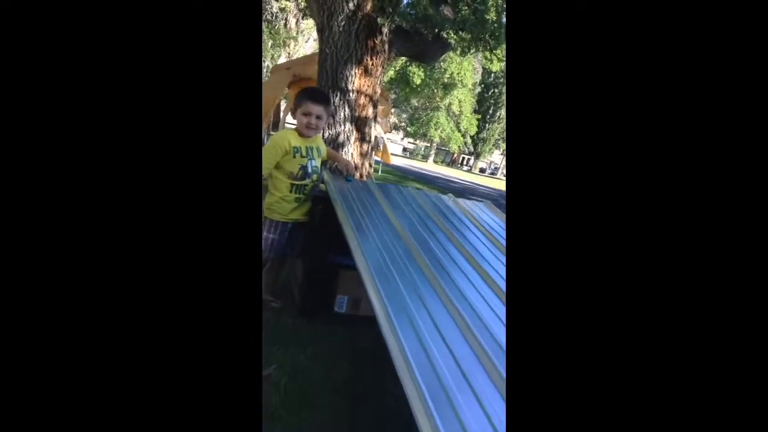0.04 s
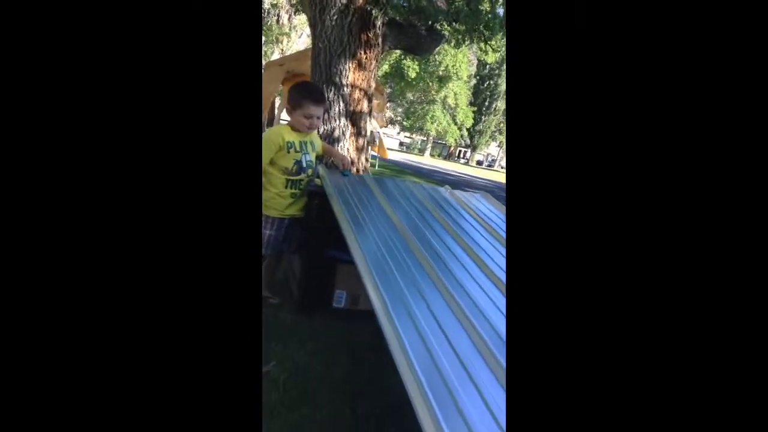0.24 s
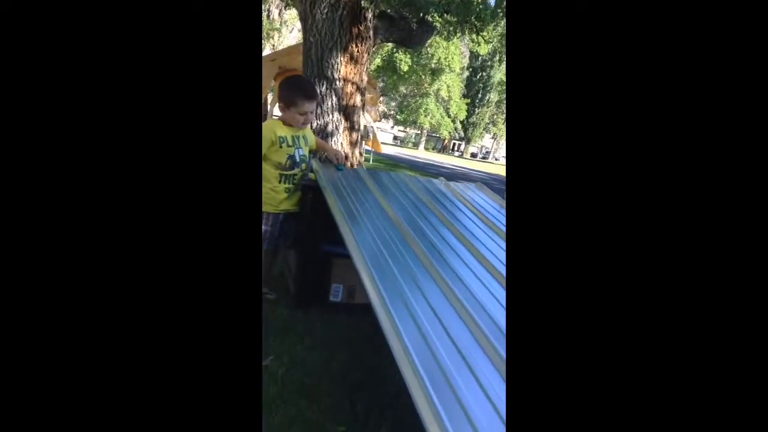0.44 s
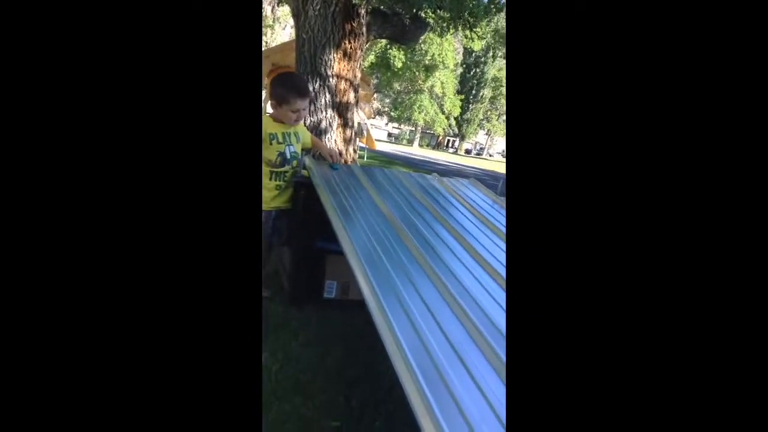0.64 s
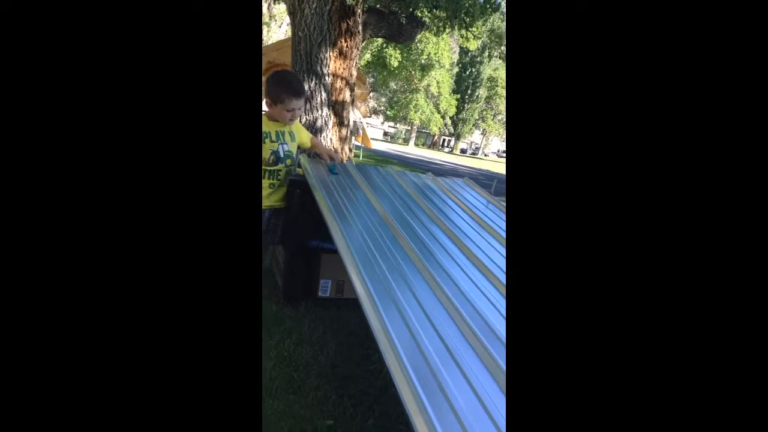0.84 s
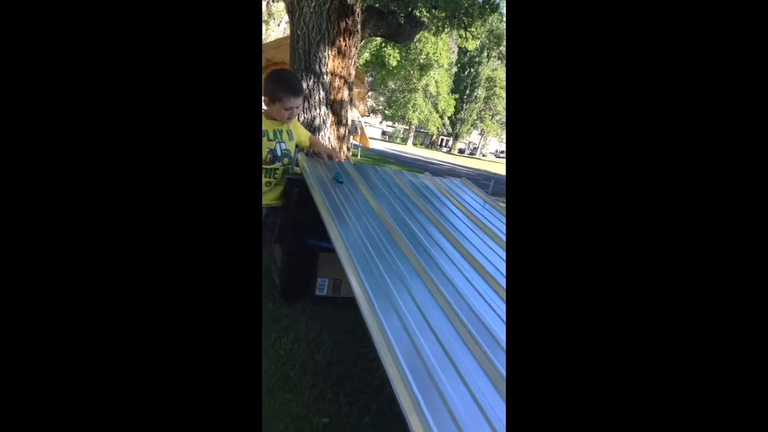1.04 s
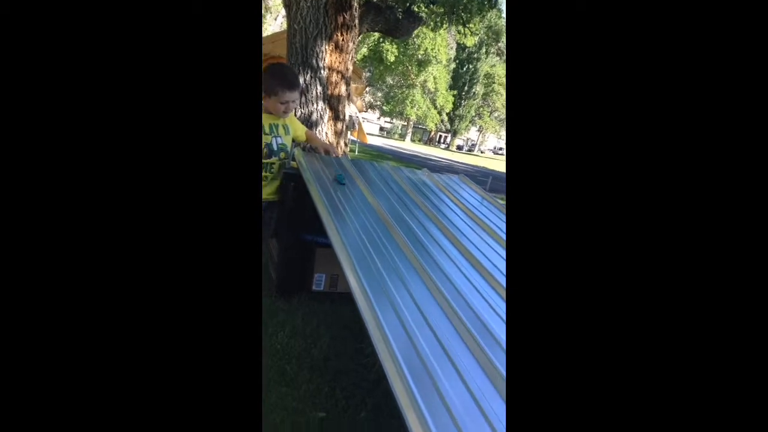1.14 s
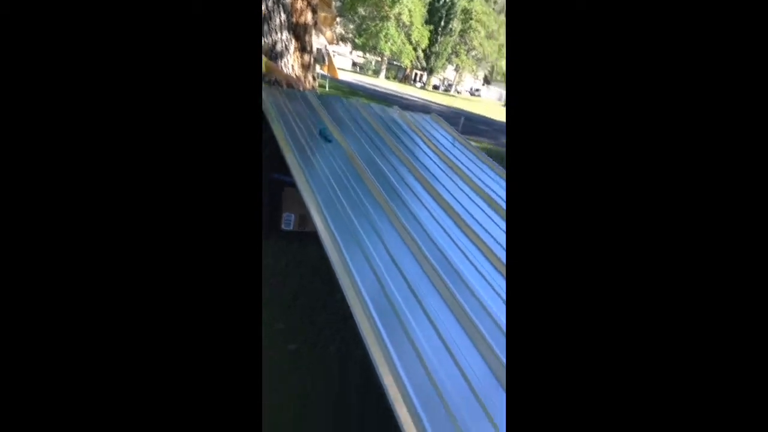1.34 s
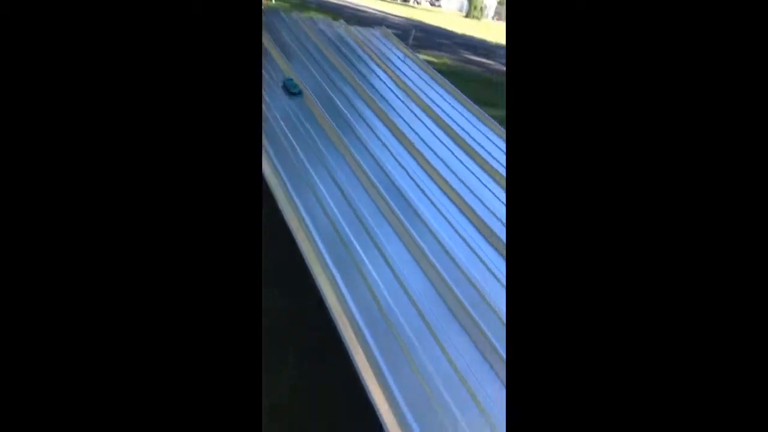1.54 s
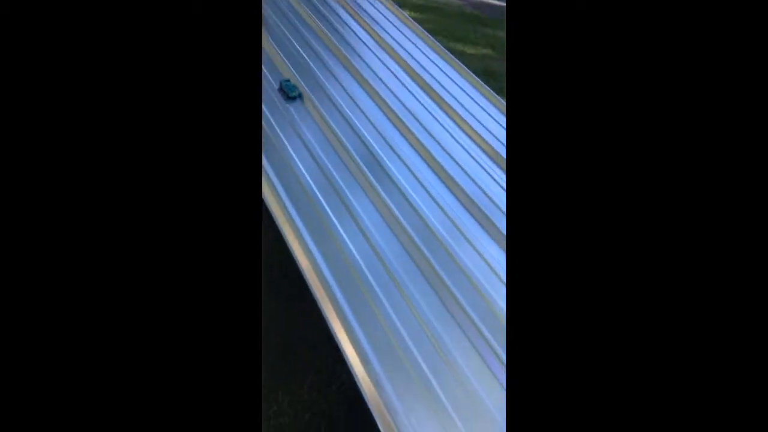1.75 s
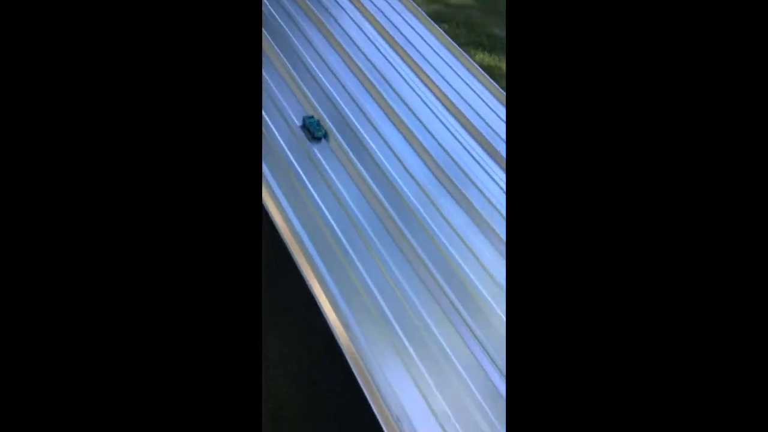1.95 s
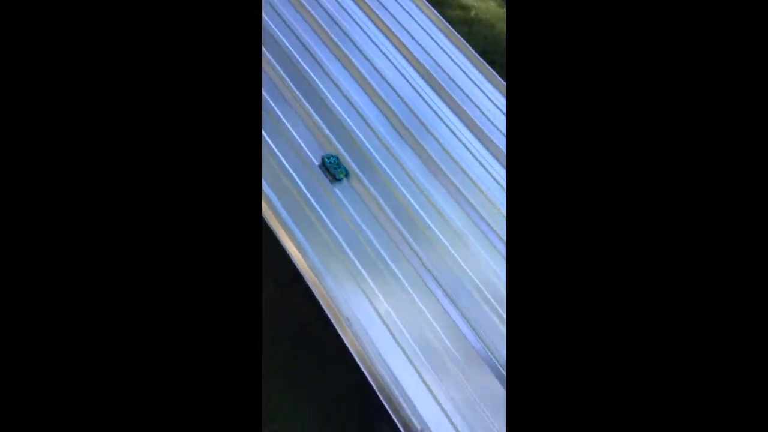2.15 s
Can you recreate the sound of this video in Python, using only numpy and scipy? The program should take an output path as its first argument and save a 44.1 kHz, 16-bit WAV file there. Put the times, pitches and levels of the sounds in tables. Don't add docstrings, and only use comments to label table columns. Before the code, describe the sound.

Toy car wheels rattle and ring down corrugated metal, swelling louder after a quiet moment with birdsong

```python
import sys
import numpy as np
from scipy import signal
from scipy.fft import rfft, irfft, next_fast_len
from scipy.io import wavfile

SR = 44100
rng = np.random.default_rng(int(sys.argv[2]) if len(sys.argv) > 2 else 0)


def wav_record(signal):
    frames = np.transpose(np.atleast_2d(signal))
    bounded = np.clip(frames, -1, 1)
    quanta = np.round(bounded * 32767).astype(np.int16)
    wavfile.write(sys.argv[1], SR, quanta)


def undo_db(level):
    steps = np.asarray(level, float) / 20
    return 10 ** steps


N = 96534

# (time [s], level [dB], brightness [dB/octave])
ROLLING_FORCE = [(0.3, -49, -1), (0.446, -55.5, -6.5), (0.668, -46, -3.5), (0.904, -34, -2),
                 (1.194, -30.5, -2), (1.204, -27, -1.5), (1.277, -31.5, -2.5), (1.33, -20.5, 1),
                 (1.34, -25, -0.5), (1.372, -23.5, 0), (1.431, -22.5, -0.5), (1.904, -21.5, 2.5),
                 (2.024, -22.5, 2.5), (2.189, -20, 0.5)]
# (time [s], peak level [dB], pitch [Hz])
AXLE_TICKS = [(0.555, -34, 6460), (0.596, -46.5, 7350), (0.624, -37, 7200), (0.6654, -40, 7040),
              (0.685, -33.5, 6740), (0.7482, -39.5, 7050), (0.7664, -42, 5800), (0.794, -36, 6100),
              (0.8096, -28, 6350), (0.8609, -28, 5860), (0.895, -30, 6150), (0.922, -51, 6840),
              (0.9375, -27, 6630), (0.9844, -27, 6400), (1.0505, -22.5, 7060), (1.0904, -26.5, 6860),
              (1.1029, -27, 6500), (1.1644, -40, 6550), (1.1987, -28, 6230), (1.254, -20.5, 7200),
              (1.2854, -25, 6240), (1.3543, -20, 6430), (1.3978, -22, 6000), (1.48, -26, 5600),
              (1.518, -16.5, 6120), (1.6598, -28, 5820), (1.735, -22.5, 5900), (1.8234, -25, 6360),
              (2.0266, -22, 5800), (2.089, -22, 5930), (2.165, -16.5, 5800)]


def rms_one(x):
    return x / np.sqrt(np.mean(x ** 2) + 1e-20)


def drift(rate_hz):
    r = np.exp(-2 * np.pi * rate_hz / SR)
    noise = rng.standard_normal(N + SR)
    return rms_one(signal.lfilter([1], [1, -2 * r, r * r], noise)[SR:])


def fade(seconds_in, fade_s):
    return 1 / (1 + np.exp(-seconds_in / fade_s))


def resonate(x, hz, width_hz):
    r = np.exp(-np.pi * width_hz / SR)
    poles = [1, -2 * r * np.cos(2 * np.pi * hz / SR), r * r]
    return signal.lfilter(np.array([1, 0, -1]) * (1 - r * r) / 2, poles, x)


def band_pass(x, order, low_hz, high_hz):
    return signal.sosfilt(signal.butter(order, [low_hz, high_hz], "band", fs=SR, output="sos"), x)


def coloured(x, spectrum, tilt_db, patchy_db):
    hz, db = np.transpose(spectrum)
    edges = 40 * 2 ** np.arange(0, 8.7, 1 / 3)
    out = 0
    for k, (low, high) in enumerate(zip(edges, edges[1:])):
        mid = np.sqrt(low * high)
        flicker_db = patchy_db + 2 * (mid > 8500)
        gain_db = np.interp(np.log(mid), np.log(hz), db) + tilt_db * np.log2(mid / 2500)
        gain_db = gain_db + flicker_db * drift(5.6)
        out = out + undo_db(gain_db) * band_pass(x[k % 2], 2, low, high)
    return out


def rings(events, t60_s, rise_s):
    out, t = np.zeros(N + SR), np.arange(SR // 4) / SR
    shape = (1 - np.exp(-t / rise_s)) * undo_db(-60 * t / t60_s)
    shape = shape / shape.max()
    for s, db, hz in events:
        start = int(s * SR)
        out[start:start + len(t)] += undo_db(db) * shape * np.sin(2 * np.pi * hz * t)
    return out[:N]


def bursts(events):
    envelope, t = np.zeros(N + SR), np.arange(SR // 4) / SR
    for s, db, t60_s in events:
        start = int(s * SR)
        envelope[start:start + len(t)] += undo_db(db - 60 * t / t60_s) * np.minimum(t / 0.0089, 1)
    return envelope[:N] * rng.standard_normal(N)


def park():
    # (frequency [Hz], level [dB per Hz])
    floor_spectrum = [(60, 1), (110, -0.5), (420, -13.5), (800, -8.5), (2500, -11.5), (5200, -8.5),
                      (6000, -35), (10000, -34), (15300, -47)]
    # (frequency [Hz], width [Hz], level [dB])
    leaves = [(3750, 500, -8), (2850, 400, -11), (5160, 79, -16.5)]
    out = rms_one(coloured(rng.standard_normal((2, N)), floor_spectrum, 0, patchy_db=2.5))
    for hz, width_hz, db in leaves:
        rustle = rms_one(resonate(rng.standard_normal(N), hz, width_hz))
        out = out + undo_db(db + 0.62 * drift(20)) * rustle
    return undo_db(-52) * out


def bird():
    # (start [s], length [s], first pitch [Hz], last pitch [Hz], level [dB])
    phrases = [(.015, .14, 3760, 3690, -56), (.05, .02, 3350, 3280, -54), (.145, .03, 3430, 3680, -52),
               (.165, .025, 3750, 4250, -57), (.18, .04, 3950, 3950, -59), (.225, .055, 3080, 2660, -53),
               (.275, .085, 2880, 2830, -58), (.385, .035, 3700, 3980, -55), (.42, .03, 2950, 2880, -53),
               (.425, .06, 3350, 3750, -56), (.44, .06, 3950, 3780, -55), (.495, .03, 3850, 3480, -52),
               (.52, .03, 3500, 3600, -56), (.53, .08, 4050, 3800, -54), (.61, .07, 3780, 3760, -54),
               (.61, .045, 3150, 2850, -56), (.68, .08, 3800, 4050, -54), (.55, .02, 5330, 5320, -54)]
    blur, blur_per_s = 0.3, 110
    out = np.zeros(N)
    for s, length_s, first, last, db in phrases:
        u = np.linspace(0, 1, int(length_s * SR))
        tone = np.sin(2 * np.pi * np.cumsum(first + (last - first) * u) / SR)
        start = int(s * SR)
        out[start:start + len(u)] += undo_db(db) * np.sqrt(2 * np.sin(np.pi * u)) * tone
    return undo_db(2.0) * out * (1 - blur + blur * drift(blur_per_s))


def thumps():
    # (time [s], peak level [dB], pitch [Hz])
    flexes = [
        (0, -47, 119),
        (.49, -46, 252),
        (.56, -42.5, 198),
        (.66, -38.5, 135),
        (.66, -38.5, 242),
        (.70, -36.5, 290),
    ]
    return rings(flexes, t60_s=0.11, rise_s=0.001)


def flexing():
    # (frequency [Hz], width [Hz], level [dB])
    modes = [(174.3, 65, -3.5), (223.6, 53, -5.5), (276.8, 28, 0), (357.5, 11.2, -8.5)]
    start_s, level_db, follows = 0.43, -46.5, 0.24
    t, (s, db, _) = np.arange(N) / SR, np.transpose(ROLLING_FORCE)
    out = 0
    for hz, width_hz, mode_db in modes:
        wide = 1.57 * width_hz
        hum = resonate(resonate(rng.standard_normal(N), hz, wide), hz, wide)
        out = out + undo_db(mode_db + 0.57 * drift(5.7)) * rms_one(hum)
    return out * undo_db(level_db + follows * (np.interp(t, s, db) + 21.5)) * fade(t - start_s, 0.026)


def seam():
    # (time [s], peak level [dB], pitch [Hz])
    drops = [
        (1.963, -28, 265),
        (1.963, -28.5, 402),
        (2.043, -35, 272),
        (2.09, -36, 216),
    ]
    return rings(drops, t60_s=0.023, rise_s=0.001)


def cracks():
    # (time [s], peak level [dB], t60 [s])
    nudges = [
        (.34, -35, 0.094),
        (.405, -39, 0.2),
        (.43, -41.5, 0.52),
    ]
    # (time [s], peak level [dB], t60 [s])
    squeaks = [
        (.72, -53, .05),
        (.81, -54, .04),
        (1.045, -50, 0.072),
        (1.1, -37, 0.091),
        (1.155, -47, 0.29),
        (1.25, -47, 0.24),
        (1.51, -28, .1),
    ]
    snap = bursts([(s, db + 14.5, 0.019) for s, db, _ in AXLE_TICKS])
    out = band_pass(snap, 5, 5600, 7900) + undo_db(-47) * snap
    out += band_pass(bursts(squeaks), 3, 10500, 14500)
    return out + band_pass(bursts(nudges), 4, 900, 4300)


def axles():
    hits = []
    for s, db, hz in AXLE_TICKS:
        for rebound in range(2):
            for partial in range(2):
                level_db = db - 7 - 2.5 * rebound - 4 * partial
                hits.append((s + 0.011 * rebound, level_db, hz * (1 + 0.05 * partial)))
    return rings(hits, t60_s=0.013, rise_s=0.0011)


def knocks():
    # (time [s], peak level [dB], pitch [Hz])
    wheel_knocks = [(0.7803, -35, 2720), (0.7986, -33, 3020), (0.8417, -33, 3040), (0.869, -28, 3000),
                    (0.894, -24.5, 3260), (0.9434, -34, 3030), (0.994, -25, 3000), (1.008, -22.5, 3370),
                    (1.047, -21, 3300), (1.0791, -30, 2500), (1.098, -20.5, 2990), (1.18, -22, 3170),
                    (1.1962, -30, 3100), (1.209, -19.5, 2900), (1.271, -23.5, 3050), (1.2916, -20, 2960),
                    (1.3018, -18, 3030), (1.3162, -11, 3000), (1.328, -15, 3000), (1.3549, -9.5, 2990),
                    (1.371, -15, 2790), (1.385, -9.5, 3100), (1.442, -24, 2860), (1.4686, -28, 3080),
                    (1.4806, -13.5, 3100), (1.5085, -19, 2970), (1.515, -14.5, 2510), (1.5506, -18, 2870),
                    (1.571, -14, 2960), (1.594, -21.5, 2960), (1.6404, -15, 2860), (1.6518, -13, 2760),
                    (1.6747, -9.5, 2760), (1.7013, -20, 2860), (1.7425, -25, 2700), (1.7518, -14, 2570),
                    (1.7865, -17, 2540), (1.796, -17.5, 2930), (1.8127, -16, 2900), (1.843, -11.5, 2534),
                    (1.877, -12, 2690), (1.9046, -10.5, 2780), (1.932, -22, 2840), (1.9507, -9.5, 2760),
                    (1.9744, -27, 2940), (1.9888, -15.5, 3250), (2.0375, -22, 2670), (2.0715, -21, 2740),
                    (2.0945, -19, 3400), (2.133, -34, 2470), (2.1597, -33, 3270)]
    return undo_db(-6) * rings(wheel_knocks, t60_s=0.02, rise_s=0.0012)


def grit():
    contacts_per_s, spread_db = 9000, 1
    sizes = undo_db(spread_db * np.minimum(rng.exponential(1, N), 5)) * rng.choice([-1, 1], N)
    return rms_one(sizes * (rng.random(N) < contacts_per_s / SR) + 1e-9)


def body_band(drive):
    # (time [s], centre [Hz], level over the rolling force [dB])
    body_path = [(1.05, 2950, -21), (1.2, 2995, -3), (1.4, 3060, -5.5), (1.45, 2900, -17), (1.5, 3070, -16),
                 (1.65, 2745, -8.5), (1.76, 2600, -10), (1.8, 2940, -7), (1.85, 2670, -9),
                 (1.95, 2740, -7.5), (1.97, 2730, -39)]
    s, hz, db = np.transpose(body_path)
    r = np.exp(-np.pi * 170 / SR)
    state, out = np.zeros((2, 2)), np.zeros(N)
    for i in range(0, N, 128):
        centre_hz = np.interp(i / SR, s, hz)
        poles = [1, -2 * r * np.cos(2 * np.pi * centre_hz / SR), r * r]
        once, state[0] = signal.lfilter([1, 0, -1], poles, drive[i:i + 128], zi=state[0])
        out[i:i + 128], state[1] = signal.lfilter([1, 0, -1], poles, once, zi=state[1])
    return rms_one(out) * undo_db(np.interp(np.arange(N) / SR, s, db))


def rolling():
    # (frequency [Hz], level [dB per Hz])
    sheet_spectrum = [(220, -104), (380, -16.5), (823, -8.5), (1070, -5.5), (1990, -4), (2930, 0.5),
                      (4950, -9), (6340, -8.5), (15300, -38)]
    # (frequency [Hz], width [Hz], level [dB], from [s], to [s])
    stretch_bands = [(582, 176, -22, 1.45, 2.5), (1642, 290, -5.5, 0.784, 1.214),
                     (2280, 88, -11, 0.67, 1.33), (3690, 310, -8.5, 0.764, 1.276),
                     (1670, 260, -10.5, 0.7, 0.79), (2960, 860, -11, 1.44, 1.56),
                     (3100, 390, -9.5, 0.78, 1.05), (6410, 1120, -10, 0.48, 1.324),
                     (979, 81, -11.5, 1.31, 1.633), (1092, 99, -14.5, 1.314, 1.563),
                     (1040, 117, -16.5, 1.67, 2.1), (1297, 300, -16, 1.56, 1.977),
                     (2244, 99, -10, 1.47, 1.763), (2365, 420, -9.5, 1.786, 1.92),
                     (3220, 250, -12.5, 1.71, 1.97), (3200, 260, -20, 1.64, 2.3),
                     (3950, 420, -8, 2.09, 2.15), (6230, 1700, -20.5, 1.97, 2.3),
                     (2180, 68, -13, 2.08, 1.7), (2760, 92, -7.5, 2.36, 2.5),
                     (4510, 340, -16.5, 0.86, 1.33), (8600, 490, -22.5, 0.96, 1.19),
                     (11940, 4200, -32, 1.2, 2.6)]
    start_s, fade_s, sway_db, chatter_db, chatter_per_s = 0.37, 0.015, 1.1, 1.2, 110
    t, (s, db, bright) = np.arange(N) / SR, np.transpose(ROLLING_FORCE)
    sway = undo_db(sway_db * (drift(42) + 0.11 * drift(86)))
    contacts = np.array([grit(), grit()]) * sway
    broad = coloured(contacts, sheet_spectrum, np.interp(t, s, bright), patchy_db=0.0)
    out = undo_db(-3.5) * broad / np.std(broad[N // 2:]) + body_band(contacts[1])
    for k, (hz, width_hz, band_db, start, end) in enumerate(stretch_bands):
        on = fade(t - start, fade_s) * fade(end - t, fade_s)
        drive = contacts[k % 2] * undo_db(chatter_db * drift(chatter_per_s))
        ringing = resonate(resonate(drive, hz, 2 * width_hz), hz, width_hz)
        out += undo_db(band_db) * on * rms_one(ringing)
    return out * undo_db(np.interp(t, s, db)) * fade(t - start_s, fade_s)


def sheet_ring(x):
    t60_s, ring_db = 0.12, -8
    size = next_fast_len(N + SR)
    w = 2 * np.pi * np.arange(size // 2 + 1) / size
    ring = 0
    for k, lag in enumerate(rng.uniform(.006, .02, 6) * SR):
        loop = undo_db(-60 * lag / SR / t60_s) * np.exp(-1j * w * lag)
        ring = ring + (-1) ** k * (1 / (1 - loop) - 1)
    ring = ring / np.sqrt(np.mean(abs(ring) ** 2))
    return irfft(rfft(x, size) * (1 + undo_db(ring_db) * ring), size)[:N]


def scene():
    background = park() + bird()
    low_metal = thumps() + flexing() + seam()
    car = cracks() + axles() + knocks() + sheet_ring(rolling())
    return np.tile(background + low_metal + car, (2, 1))


def top_cut(x):
    return signal.sosfilt(signal.butter(12, 15450, fs=SR, output="sos"), x)


def record(dry):
    # (frequency [Hz], width [Hz], level [dB])
    mic_colour = [(10400, 4000, -7.5), (11240, 840, 3.5)]
    for hz, width_hz, db in mic_colour:
        dry = dry + (undo_db(db) - 1) * resonate(dry, hz, width_hz)
    mix = signal.sosfilt(signal.butter(3, 146, "high", fs=SR, output="sos"), dry)
    return top_cut(mix)


dry = scene()
out = record(dry)
wav_record(out)
```